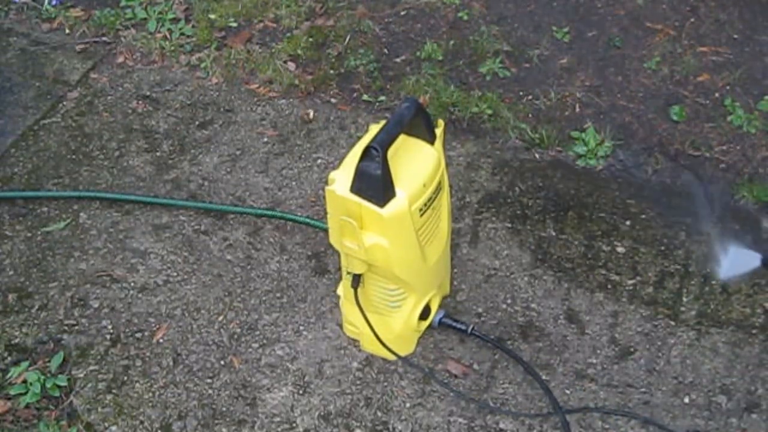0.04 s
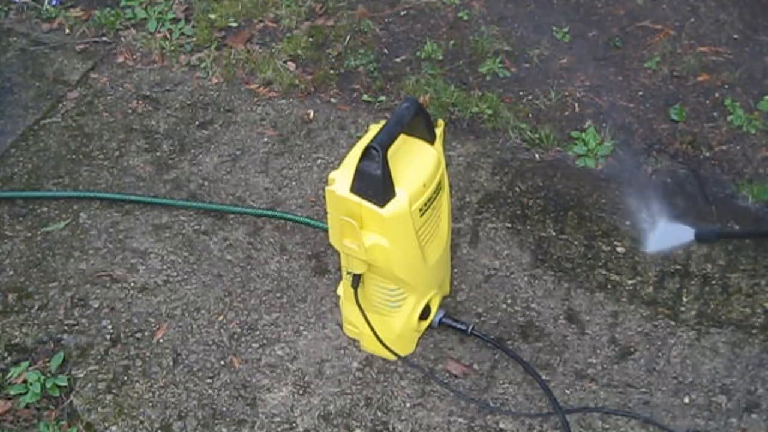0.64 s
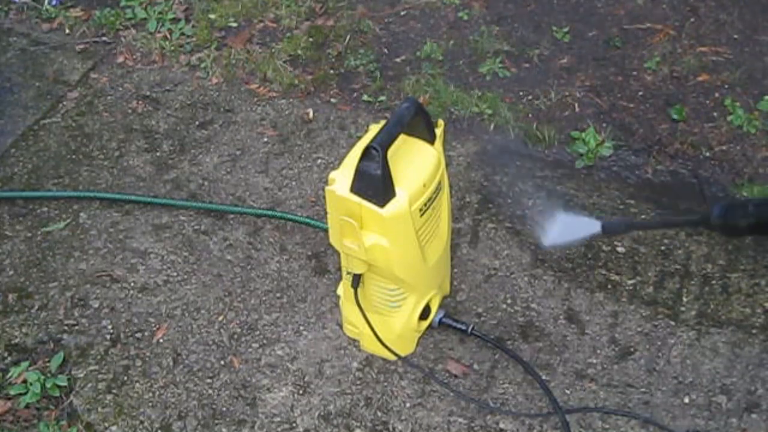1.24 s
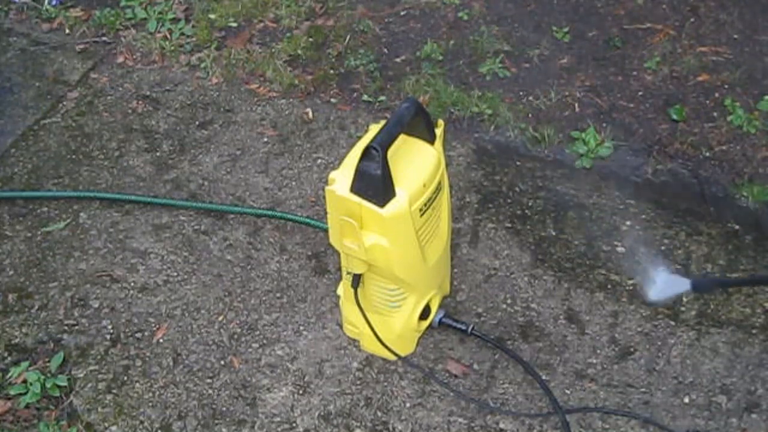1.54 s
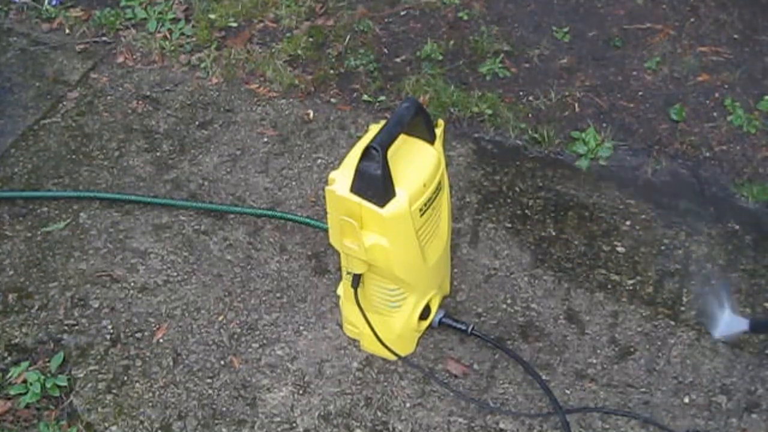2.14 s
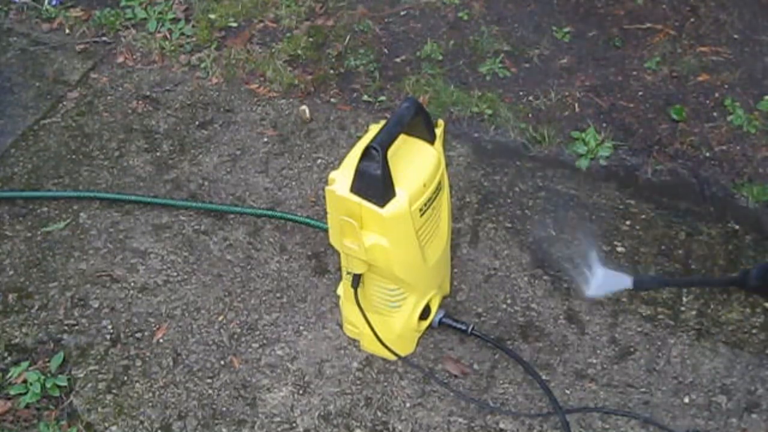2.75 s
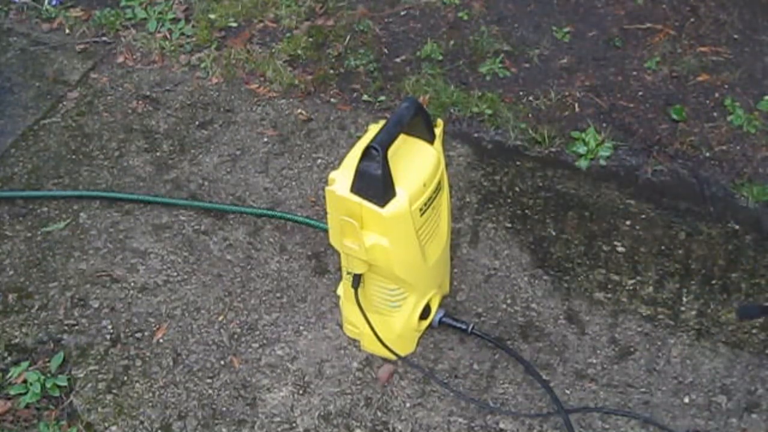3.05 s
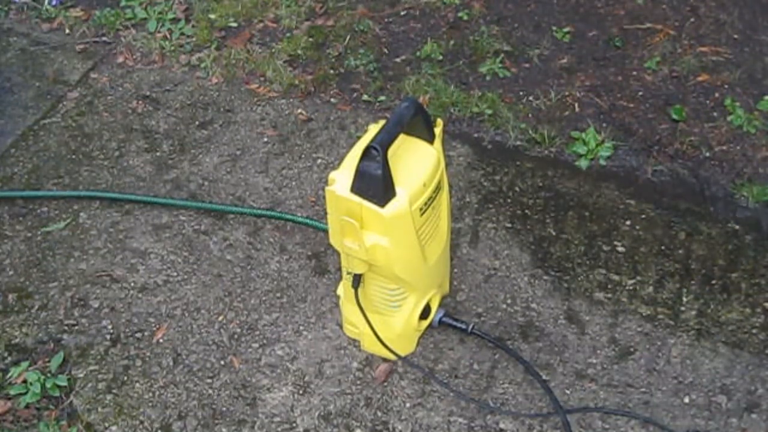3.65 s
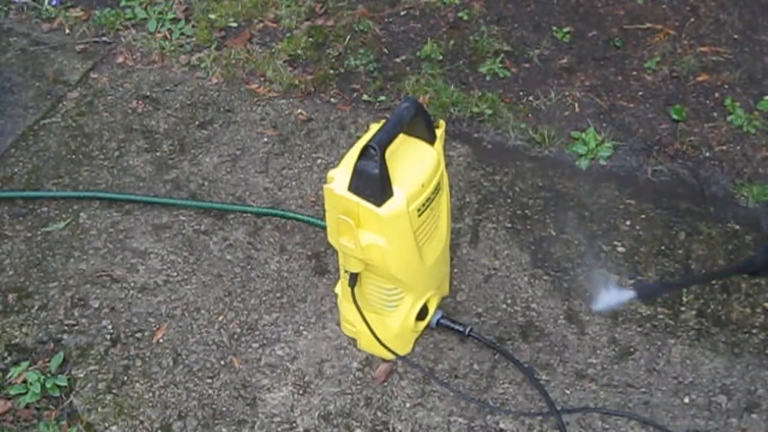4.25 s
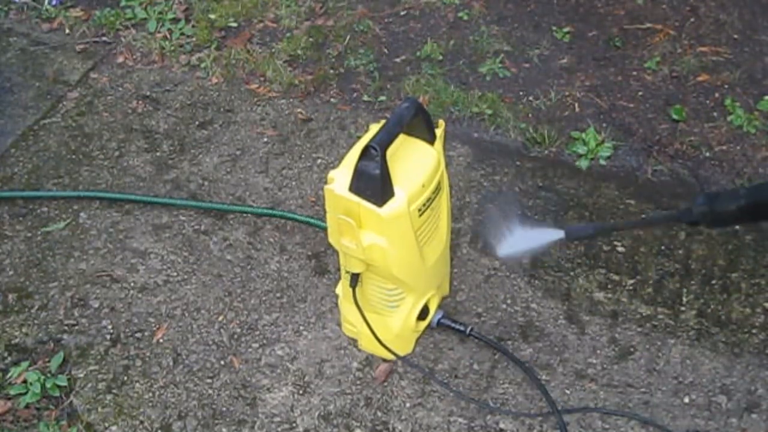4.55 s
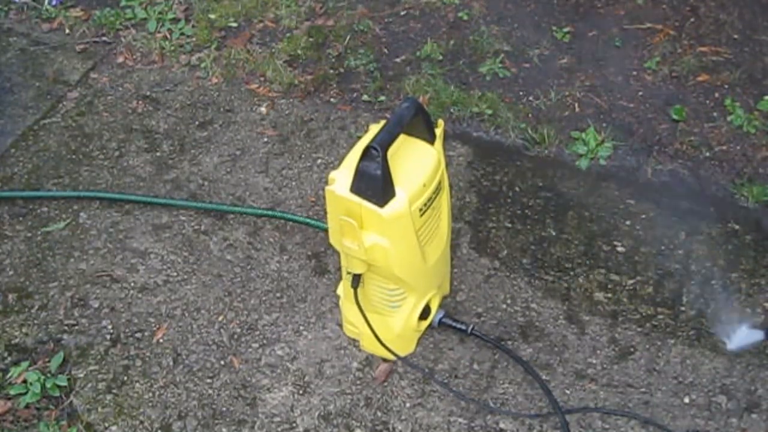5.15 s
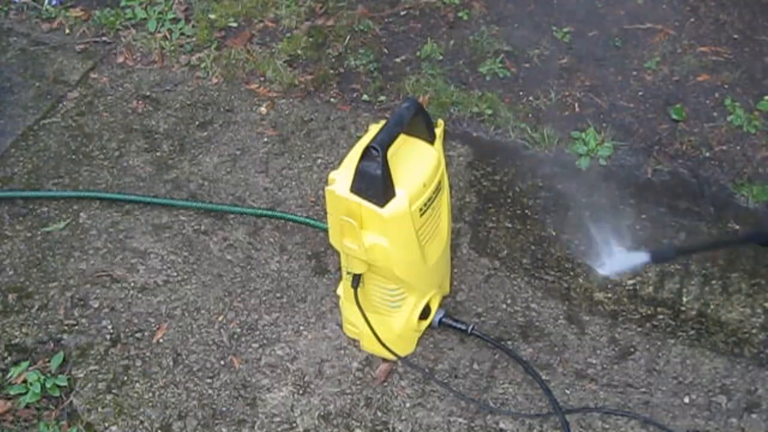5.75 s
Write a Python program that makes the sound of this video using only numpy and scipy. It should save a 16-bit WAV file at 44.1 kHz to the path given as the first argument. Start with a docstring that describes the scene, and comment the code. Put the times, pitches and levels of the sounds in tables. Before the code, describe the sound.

Outdoors, a pressure washer's motor drones under a hissing water jet, winds down briefly, then growls back up and resumes spraying.

```python
"""An electric pressure washer runs on a concrete yard: a geared motor drives a piston pump, whose periodic
strokes excite the resonances of a plastic housing, and the fan jet hisses as it sweeps over the ground.
The trigger snaps shut, the motor runs down and a valve clunks. The water line whistles faintly in the
pause, then the trigger snaps open and the motor spins up with a growl.
Walls return a weak echo over a faint outdoor background."""
import sys
import numpy as np
from scipy import signal
from scipy.fft import rfft, irfft
from scipy.io import wavfile
from scipy.ndimage import uniform_filter1d

SR = 44100
rng = np.random.default_rng(int(sys.argv[2]) if len(sys.argv) > 2 else 0)


def unload_wav(signal):
    """Save mono or channel-first audio to the path in sys.argv[1] as 16-bit WAV at rate SR, clipped to [-1, 1]."""
    wavfile.write(
        sys.argv[1],
        SR,
        np.round(np.clip(np.atleast_2d(signal).T, -1, 1) * 32767).astype(np.int16),
    )


N = 256220
TIME = np.arange(N) / SR
MOTOR_OFF_S, JET_SHUT_S, STALL_S, JET_OPEN_S, MOTOR_ON_S = 2.9, 3.112, 3.226, 4.0, 4.076
SHAFT_RATIO = 4.706  # turns of the motor shaft per pump stroke

# Pump speed under load. Each row: time in seconds, strokes per second.
WORKING_SPEED = [(0, 67.22), (1, 67.4), (2.2, 67.5), (2.55, 67.7), (2.75, 67.5), (4.42, 67.75),
                 (4.87, 67.45), (5, 67.8)]
# Pump strokes heard through the housing. Each row: frequency in Hz, relative harmonic level in dB.
HUM_SPECTRUM = [(30, -53), (67, -33), (135, -27), (203, -4), (268, -0.64), (288, 5), (335, -2.5), (405, -2),
                (473, -8.5), (540, -10), (610, -20.5), (900, -7.5), (1100, -12.5), (2400, -20.5),
                (6000, -19)]
# Harmonics coloured by the gears and valves. Each row: multiple of the stroke rate, gain in dB.
GEAR_ORDERS = [(5, 5), (8, 2.5), (11, 3.5), (12, 8), (13, 2), (14, 0), (15, 6.5), (18, 7), (19, 9.5),
               (20, -5), (21, 0), (22, 10), (23, 9.5), (24, 6.5), (27, 10.5), (28, 12.5), (29, 7), (33, 1),
               (34, 14.5), (35, 1), (39, -6), (40, 5), (41, 2)]
# Very slight easing of the hum near the end. Each row: time in seconds, gain in dB.
HUM_EASING = [(4.75, 0.05), (5.05, 0)]
# Slow swings of the clatter. Each row: time in seconds, gain in dB.
CLATTER_GAIN = [(0, -26.5), (1.2, -28.5), (1.6, -31), (2.4, -31.5), (2.7, -29), (3.03, -32.5), (4.25, -33),
                (4.45, -29), (4.8, -29.5), (5.05, -35), (5.45, -33), (5.7, -29.5)]
# Loose gears shudder as speed changes. Each row: centre in seconds, half length in seconds, gain in dB.
SHUDDERS = [(2.972, 0.034, 5.5), (3.105, 0.054, 4.5), (3.212, 0.022, 4.5), (4.155, 0.025, 2)]
# Shaft tones. Each row: multiple of the shaft rate, relative level in dB under load, the same coasting.
SHAFT_TONES = [(3, -29, -10.5), (4, -24, -11), (6, -9, -8), (7, -12, -22), (8, -13.5, -0.5), (16, -35, 5.5)]
# Transmission of the shaft tones by the housing. Each row: frequency in Hz, gain in dB.
HOUSING_RESPONSE = [(50, -90), (400, -32), (600, -22), (750, -1.5), (930, 7), (1060, -9), (1200, 1.5),
                    (1350, -21), (1530, 5), (1700, -7), (1850, -7.5), (2080, -18), (2330, -10),
                    (2560, -4.5), (2800, -24), (3200, -28), (6000, -45)]

# Spectra of the noise sources. Each row: frequency in Hz, relative spectral density in dB.
THROB_SPECTRUM = [(30, -40), (130, -25), (190, -14), (250, -1), (320, 5), (420, 4), (520, -1.5), (650, -14),
                  (1500, -48)]  # pump body
VALVE_SPECTRUM = [(100, -49), (500, -14), (640, -9), (800, -2), (950, 4), (1130, -1), (1450, -0.5),
                  (1700, 0.5), (1890, 4), (2080, -3.5), (2680, -1.5), (3000, -12), (4200, -9),
                  (6000, -11.5), (16000, -31)]  # clattering valves
BACKLASH_SPECTRUM = [(100, -40), (450, -18), (620, -0.5), (820, -2), (940, 6), (1060, -1), (1220, 8.5),
                     (1380, -4), (1600, 3), (2100, -10), (2650, -3), (3200, -21), (6000, -22),
                     (16000, -43.5)]  # loose gears
BOOM_SPECTRUM = [(100, -35), (200, -17), (255, -7), (292, 5.5), (330, -5.5), (430, -10), (800, -45)]  # housing, when the pump runs loose
GROWL_SPECTRUM = [(100, -18), (600, -10), (820, -1), (940, 10.5), (1060, 0), (1250, -3), (1650, 0),
                  (2200, -3), (4500, -8), (5600, -14), (16000, -32)]  # motor straining from rest
SPRAY_SPECTRUM = [(100, -46), (400, -14), (620, -18), (780, -10), (1000, -5.5), (2000, 2), (3000, -0.5),
                  (4500, 0), (6300, -1), (9000, 3), (11000, -1.5), (13500, -1.4), (15800, -2.5)]  # spray on concrete
SNAP_SPECTRUM = [(60, -47), (200, -22), (490, -11.5), (780, -21), (1100, -15.5), (1900, -4), (2550, -6),
                 (4060, -2), (4750, -7), (5400, -10), (7000, -9), (9400, -11), (15500, -19)]  # valves snapping
YARD_SPECTRUM = [(20, -12), (66, -9.5), (140, -8.5), (190, -6), (500, -6.5), (1000, -1.5), (1600, -10),
                 (2500, -18.5), (4000, -18), (7000, -24), (16000, -45)]  # outdoor background

# Sweep of the lance. Each row: time in seconds, reach (negative towards the machine, positive away).
LANCE_REACH = [(0, -0.084), (.4, -0.09), (.8, -0.68), (1.3, -0.67), (1.8, 1), (2.3, 1.1), (2.7, -0.54),
               (3, 0.056), (4.2, 1.1), (4.5, -0.57), (4.8, -0.23), (4.95, .9), (5.3, 1.6), (5.81, .1)]
# Colour of the jet as it swings away. Each row: frequency in Hz, gain in dB per unit of reach.
SWING_COLOUR = [(700, 1), (1900, -1.5), (2500, 0), (3200, -1.7), (4500, -0.8), (6300, 0.5), (9000, -2),
                (10000, -2), (11200, 1.5), (12400, 3), (13600, -0.5), (15000, -1)]
# Wandering resonance of the jet's impact. Each row: time in seconds, frequency in Hz, height in dB.
IMPACT_RESONANCE = [(0.1, 4100, 1), (.6, 3870, 2), (.8, 2420, 6), (1.0, 3100, 2), (1.22, 3320, 6),
                    (1.37, 2830, 3), (1.56, 3350, 4), (1.72, 4150, 1), (1.98, 2730, 8), (2.35, 2220, 1.5),
                    (2.75, 3220, 1), (3.1, 2550, 1), (4.38, 2850, 2), (4.78, 2820, 3.5), (5.2, 2305, -1),
                    (5.5, 2360, 3.5), (5.75, 1930, 4)]
# The trigger lever strikes its stop, released and then squeezed. Each row: start in seconds, gain in dB.
TRIGGER_STRIKES = [(2.9083, -21), (3.9983, -21)]
# Modes of the trigger gun. Each row: frequency in Hz, relative level in dB, T60 in seconds.
GUN_MODES = [(1780, -2, 0.023), (2520, -1, 0.014), (2800, 2, .02), (3190, 1, .018), (4020, -9, .016),
             (4500, -1, .016), (11250, 3, 0.014)]
# Gun and valve snaps. Each row: peak time in seconds, level in dB, seconds to rise 10 dB, T60 in seconds.
VALVE_SNAPS = [(2.9078, -13, .0003, 0.0098), (2.991, -18.5, 0.004, .028), (3.007, -26, .001, 0.018),
               (3.094, -32, .001, .02), (3.111, -23, .001, 0.017), (3.130, -27, .001, 0.02),
               (3.152, -33, .003, 0.18), (3.9866, -27.5, .0006, 0.048), (3.997, -12.5, 0.00082, 0.016),
               (3.9988, -7.5, 0.0007, 0.018), (4.078, -24, .0008, 0.04), (4.096, -21, .0005, .012),
               (4.106, -16.5, .001, 0.02), (4.1236, -18, .0004, .008)]
# Knocks inside the pump. Each row: start in seconds, gain in dB.
PUMP_KNOCKS = [(3.092, -26), (3.11, -18), (3.129, -22), (3.2739, -19.5), (3.2774, -16.5), (4.097, -32),
               (4.105, -28)]
# Modes of the pump body. Each row: frequency in Hz, relative level in dB, T60 in seconds.
PUMP_MODES = [(433, -16, 0.12), (896, -18, 0.071), (1140, -8, 0.04), (1310, -12, 0.025), (1426, 0.5, 0.032),
              (2520, -17, 0.033), (3350, -19, .025), (4000, -23, 0.017)]
# Whistles of the water line. Each row: start in seconds, length in seconds, pitch in Hz,
# glide in Hz per second, level in dB, phase roughness in radians.
WHISTLES = [(3.21, .025, 3890, 0, -48, .3), (3.244, 0.031, 3890, 303, -48, .3),
            (3.28, 0.15, 3925, 50, -59, .3), (3.465, .06, 3940, 0, -64, .3),
            (3.68, 0.096, 3750, 300, -51.5, .35), (3.76, .14, 3860, 200, -62, 1.6)]


def machine(speed, hum_db=-35, hum_follows=0.57, stutter=0.45, fade_speed=18.7):
    """Forced vibration: motor and pump drive the housing; below working speed, loose parts rattle."""
    strokes = np.cumsum(speed) / SR
    pace = speed / speed.max()
    before_restart = TIME < MOTOR_ON_S
    loose = np.clip((67 - speed) / 10, 0, 1)
    slack = np.clip((66 - speed) / 20, 0, 1)
    coasting = np.clip((67 - speed) / 5, 0, 1) * before_restart
    slow_db, = curves(CLATTER_GAIN)
    swing_db = hum_follows * (slow_db - slow_db.mean())
    hum_gain = amp(hum_db + swing_db - 4 * coasting + curves(HUM_EASING)[0])
    clatter_gain = amp(slow_db + sum(swell(*row) for row in SHUDDERS))

    harmonics = pump(strokes, speed) * pace ** 0.77
    throb = rattle(strokes, THROB_SPECTRUM, depth=0.075, grain_db=-2)
    throb *= amp(-11 + 10 * slack) * pace ** np.where(before_restart, 0.98, 0.48)
    valves = amp(-3.5) * (1 - 0.5 * loose) * rattle(strokes, VALVE_SPECTRUM, depth=0.1, grain_db=0.5)
    gears = amp(-1.5) * loose * rattle(SHAFT_RATIO * strokes, BACKLASH_SPECTRUM, depth=0.28, grain_db=1.5)
    boom = amp(-33) * coasting * pace ** 0.61 * rattle(strokes, BOOM_SPECTRUM, depth=0.25, grain_db=1.5)
    hum = hum_gain * (harmonics + throb) * (1 + stutter * loose * drift(90))
    parts = hum + clatter_gain * (valves + gears) + boom

    running = np.clip(speed / fade_speed, 0, 1) ** 2
    take_up = np.minimum(abs(TIME - MOTOR_ON_S) / 0.0018, 1)  # softens the onset at the restart
    return take_up * (running * parts + clatter_gain * shaft_whine(strokes, speed, coasting))


def motor_speed(coast_rate=123, brake_rate=296, creep_speed=10.3, kick_speed=20, spin_up_s=0.066):
    """Inertia: strokes per second fall gently, then hard against the shut valve, and build up again."""
    working, = curves(WORKING_SPEED)
    coasted = coast_rate * (np.clip(TIME, MOTOR_OFF_S, JET_SHUT_S) - MOTOR_OFF_S)
    braked = brake_rate * np.maximum(TIME - JET_SHUT_S, 0)
    shortfall = (working - kick_speed) * np.exp(-np.maximum(TIME - MOTOR_ON_S, 0) / spin_up_s)
    speed = working - np.where(TIME < MOTOR_ON_S, coasted + braked, shortfall)
    return np.maximum(speed, creep_speed * decay(STALL_S, t60=0.15))


def pump(strokes, speed, resonance_hz=298, width_hz=31, uneven_db=-17, flutter_db=2.0):
    """Periodic strokes give a harmonic series; the housing delays low harmonics and scatters high ones."""
    out = np.zeros(N)
    speeds = np.linspace(0, speed.max(), 64)
    gear_db = dict(GEAR_ORDERS)
    for k in range(1, 89):
        level = np.interp(speed, speeds, amp(spectrum_db(HUM_SPECTRUM, k * speeds) + gear_db.get(k, 0)))
        phase = -np.arctan(2 * (k * speed - resonance_hz) / width_hz)
        if k > 10:  # the high harmonics waver, the low ones hold steady
            phase = 2 * np.pi * rng.random() + 0.2 * drift(12)
            level *= amp(flutter_db * drift(8.3))
        out += level * np.cos(2 * np.pi * k * strokes + phase)
    for k in (3.5, 4.5, 5.5):  # unequal alternate strokes add half orders
        level = amp(uneven_db + spectrum_db(HUM_SPECTRUM, k * speed))
        out += level * np.cos(2 * np.pi * (k * strokes + rng.random()))
    return np.sqrt(2) * amp(-7) * out * (1 + 0.11 * drift(45))


def shaft_whine(strokes, speed, coasting, wander_rad=0.31, rasp_rad=0.36, judder=0.33, fade_speed=32):
    """Shaft orders glide through the housing's resonances; coasting, modulation roughens them."""
    out = np.zeros(N)
    turns = SHAFT_RATIO * strokes
    for order, loaded_db, coasting_db in SHAFT_TONES:
        phase = 2 * np.pi * order * turns + wander_rad * drift(40) + rasp_rad * coasting * drift(300)
        source_db = loaded_db + (coasting_db - loaded_db) * coasting
        housing_db = spectrum_db(HOUSING_RESPONSE, order * SHAFT_RATIO * speed)
        flutter = 1 + 0.15 * (1 + coasting) * drift(150) / np.sqrt(2)
        out += amp(source_db + housing_db) * flutter * np.cos(phase)
    out *= 1 + judder * coasting * np.cos(2 * np.pi * 2 * turns + drift(60))  # twice a turn
    turning = np.where(TIME < MOTOR_ON_S, decay(STALL_S, t60=0.04), 1)
    return np.sqrt(2) * out * np.minimum(speed / fade_speed, 1) ** 1.37 * turning


def rattle(cycles, spectrum, depth, grain_db):
    """Amplitude modulation: the grainy noise of moving parts swells once in each cycle."""
    gate = 1 + depth * np.cos(2 * np.pi * cycles)
    noise = rng.standard_normal(N) * gate * amp(grain_db * drift(700))
    return patchy(colour(noise, spectrum), depth_db=1.5)


def starting_growl(speed, level_db=-23.5, rise_s=0.016, t60=0.36):
    """Modulated noise: the motor straining from rest rasps once a turn, fading as it gathers speed."""
    envelope = np.clip((TIME - MOTOR_ON_S) / rise_s, 0, 1) * decay(MOTOR_ON_S + rise_s, t60)
    turns = SHAFT_RATIO * np.cumsum(speed) / SR
    return amp(level_db) * envelope * rattle(turns, GROWL_SPECTRUM, depth=0.5, grain_db=3.0)


def jet(speed, sputter_db=0.87, away_db=0.5, width_octaves=0.069, overtone=0.13):
    """Random impacts of spray on concrete sum to broadband noise, coloured by the swing of the lance."""
    sputter = rng.standard_normal(N) * amp(sputter_db * drift(600))
    hiss = patchy(colour(sputter, SPRAY_SPECTRUM), depth_db=1.7)
    hz, t, frames = signal.stft(hiss, SR, nperseg=512)
    sweep = curves(LANCE_REACH) + curves(IMPACT_RESONANCE)
    reach, centre_hz, peak_db = (np.interp(t, TIME, curve) for curve in sweep)
    octaves = np.log2((hz[:, None] + 1) / centre_hz)
    peaks = bell(octaves, width_octaves) + overtone * bell(octaves - 1, width_octaves)
    swing_db = (away_db + spectrum_db(SWING_COLOUR, hz))[:, None] * reach
    frames *= amp(swing_db + peak_db * peaks)
    return flow(speed) * signal.istft(frames, SR, nperseg=512)[1][:N]


def flow(speed, jet_db=-25, dribble_db=-31, spurt_db=-23.5, seep_db=-58, opening_db_per_s=1497):
    """Hiss grows with flow: a dribble on shutting, a spurt of stored hose pressure, then the pump."""
    full_jet = amp(jet_db) * decay(JET_SHUT_S, t60=0.035)
    dribble = amp(dribble_db) * decay(JET_SHUT_S, t60=0.19)
    opening_db = -opening_db_per_s * np.maximum(JET_OPEN_S - TIME, 0)
    spurt = amp(spurt_db + opening_db) * decay(JET_OPEN_S, t60=0.33)
    pumped = amp(jet_db) * (TIME > MOTOR_ON_S) * (speed / speed.max()) ** 0.71
    strength = np.maximum(full_jet, dribble) + np.hypot(spurt, pumped)
    dip_db = swell(2.924, half_length_s=0.0077, db=-11)  # the hiss dips after the first snap
    surge_db = swell(4.165, half_length_s=0.021, db=2.8)  # overshoot as the pump picks up
    return np.hypot(strength * amp(dip_db + surge_db), amp(seep_db))


def trigger():
    """Impact excitation: the lever hits its stop and the plastic gun rings briefly in its modes."""
    out, t = np.zeros(N), np.arange(SR // 10) / SR
    for start_s, db in TRIGGER_STRIKES:
        add(out, start_s, amp(db) * ring(GUN_MODES, t))
    return out


def valve_snaps():
    """Pressure transients: a valve shutting or opening under load gives a sharp broadband crack."""
    envelope = np.zeros(N)
    for peak_s, db, rise_s, t60 in VALVE_SNAPS:
        envelope += amp(db - np.maximum((peak_s - TIME) * 10 / rise_s, (TIME - peak_s) * 60 / t60))
    return envelope * colour(rng.standard_normal(N), SNAP_SPECTRUM)


def pump_knocks(tick_db=-13, tick_t60=0.046, attack_s=0.00035):
    """Impact excitation: each knock is a short tick of noise and the free vibration of the pump body."""
    out, t = np.zeros(N), np.arange(SR // 4) / SR
    for start_s, db in PUMP_KNOCKS:
        tick = colour(rng.standard_normal(len(t)), VALVE_SPECTRUM) * amp(tick_db - 60 * t / tick_t60)
        attack = 1 - np.exp(-t / attack_s)
        add(out, start_s, amp(db) * (ring(PUMP_MODES, t) + tick) * attack)
    return out


def line_whistle(waver=0.48):
    """Flow-excited tones: water squeezes past a valve seat in thin spurts; the last frays into a fizz."""
    out = np.zeros(N)
    for start_s, length_s, hz, glide, db, rough_rad in WHISTLES:
        age = np.clip(TIME - start_s, 0, length_s)
        phase = 2 * np.pi * np.cumsum(hz + glide * age) / SR + rough_rad * drift(300)
        envelope = np.sqrt(abs(np.sin(np.pi * age / length_s)))
        out += amp(db) * envelope * np.sin(phase)
    return out * (1 + waver * drift(60))


def walls(x, gain_db=-19, t60=0.7, delay_s=0.025, dull_hz=2200, low_cut_hz=600):
    """Reverberation: reflections from the walls around the yard merge into a weak, dull tail."""
    t = np.arange(SR // 2) / SR
    tail = rng.standard_normal(len(t)) * amp(-60 * t / t60) * (t > delay_s)
    tail = signal.lfilter(*signal.butter(1, dull_hz, fs=SR), tail / np.linalg.norm(tail))
    tail = signal.lfilter(*signal.butter(2, low_cut_hz, "high", fs=SR), tail)
    return amp(gain_db) * signal.oaconvolve(x, tail)[:N]


def yard(level_db=-50.5):
    """Stationary coloured noise forms the faint outdoor background."""
    return amp(level_db) * colour(rng.standard_normal(N), YARD_SPECTRUM)


def ring(modes, t):
    """Free vibration of a struck object is a sum of damped sinusoids."""
    return sum(amp(db - 60 * t / t60) * np.sin(2 * np.pi * (hz * t + rng.random()))
               for hz, db, t60 in modes)


def patchy(x, depth_db):
    """Random modulation lets narrow bands swell and sink for tens of milliseconds, at rms 1."""
    frames = signal.stft(x, SR, nperseg=1024, noverlap=768)[2]
    patches = uniform_filter1d(rng.standard_normal(frames.shape), size=3, axis=0)
    patches = uniform_filter1d(patches, size=7, axis=1)
    frames *= amp(depth_db * unit(patches))
    return unit(signal.istft(frames, SR, nperseg=1024, noverlap=768)[1][:N])


def colour(x, spectrum):
    """Filtering in the frequency domain imposes a spectrum, at rms 1."""
    hz = np.fft.rfftfreq(len(x), 1 / SR)
    return unit(irfft(rfft(x) * amp(spectrum_db(spectrum, hz)), len(x)))


def spectrum_db(spectrum, hz):
    """Interpolation of a spectrum in dB on a logarithmic frequency axis."""
    known_hz, db = np.transpose(spectrum)
    return np.interp(np.log(hz + 1), np.log(known_hz), db)


def curves(rows):
    """Linear interpolation of each column of a time table, sample by sample."""
    times, *columns = np.transpose(rows)
    return [np.interp(TIME, times, column) for column in columns]


def drift(rate):
    """Random fluctuation of rms 1, passing through `rate` new values a second."""
    return unit(np.interp(TIME * rate, np.arange(4096), rng.standard_normal(4096)))


def bell(offset, width):
    """Gaussian curve of height 1."""
    return np.exp(-(offset / width) ** 2)


def swell(centre_s, half_length_s, db):
    """Gaussian rise and fall in dB around a moment."""
    return db * bell(TIME - centre_s, half_length_s)


def decay(start_s, t60):
    """Exponential decay: the gain holds at 1 until the start, then loses 60 dB every t60 seconds."""
    return amp(-60 * np.maximum(TIME - start_s, 0) / t60)


def amp(db):
    """Decibels to amplitude ratio."""
    return 10 ** (np.asarray(db) / 20)


def unit(x):
    """Normalisation to rms 1."""
    return x / np.sqrt(np.mean(x ** 2) + 1e-20)


def add(mix, start_s, sound):
    """Superposition of a sound on the mix from a given time."""
    part = mix[round(start_s * SR):][:len(sound)]
    part += sound[:len(part)]


def scene():
    """Superposition: the washer, its reflections and the background reach both channels alike."""
    speed = motor_speed()
    washer = machine(speed) + starting_growl(speed) + jet(speed)
    washer = washer + trigger() + valve_snaps() + pump_knocks() + line_whistle()
    mono = washer + walls(washer) + yard()
    return np.array([mono, mono])


def record(dry, notch_hz=7930, notch_q=2.65, edge_hz=15900):
    """Linear filtering cuts a deep notch in the treble and limits the bandwidth."""
    notched = signal.lfilter(*signal.iirnotch(notch_hz, notch_q, SR), dry)
    low_pass = signal.firwin(511, edge_hz, window=("kaiser", 9), fs=SR)
    return signal.oaconvolve(notched, low_pass[None], "same")


dry = scene()
out = record(dry)
unload_wav(out)
```